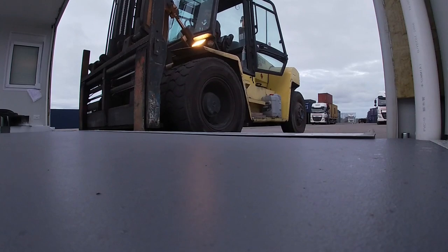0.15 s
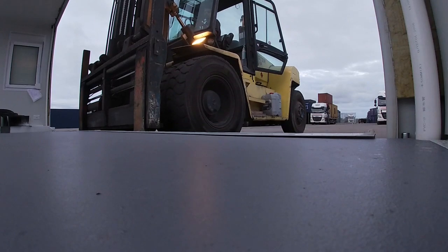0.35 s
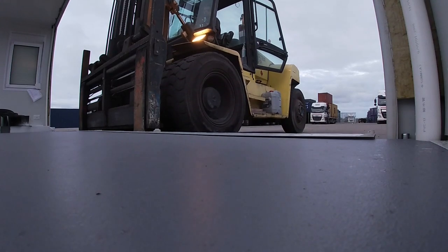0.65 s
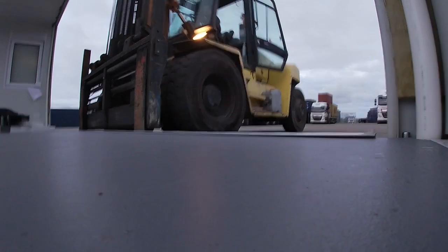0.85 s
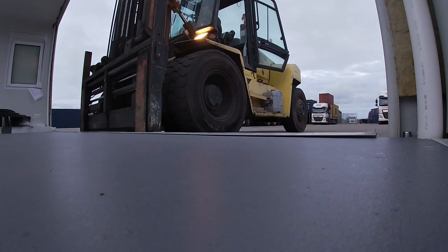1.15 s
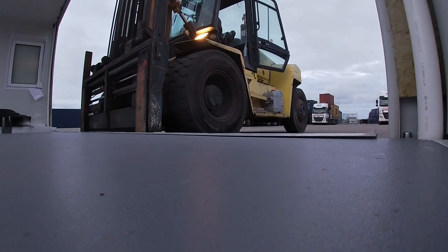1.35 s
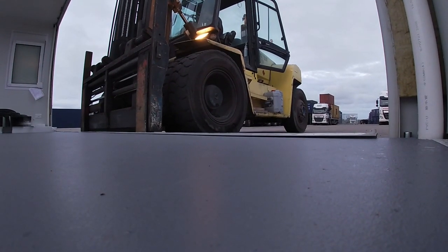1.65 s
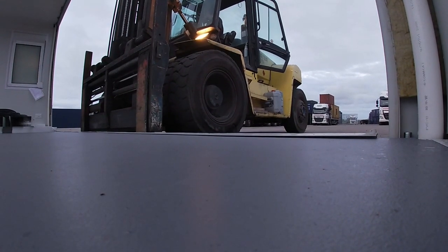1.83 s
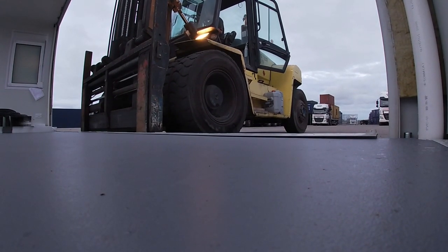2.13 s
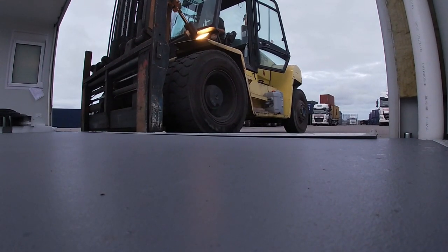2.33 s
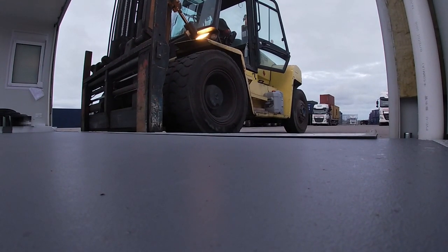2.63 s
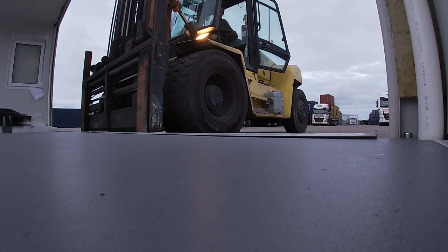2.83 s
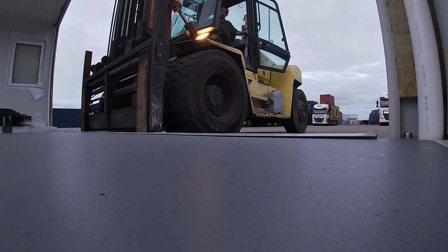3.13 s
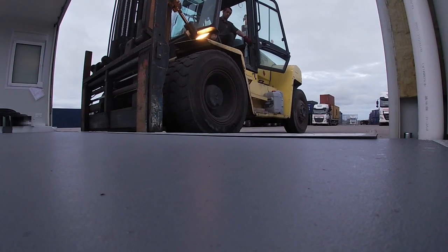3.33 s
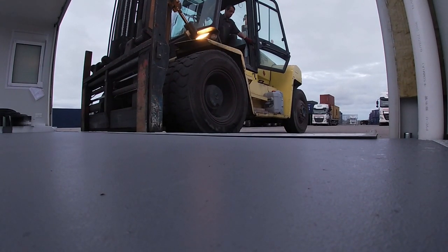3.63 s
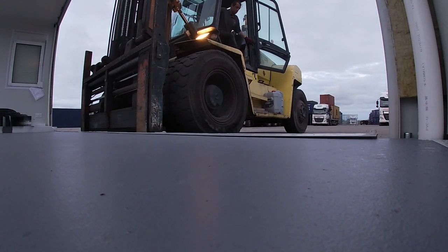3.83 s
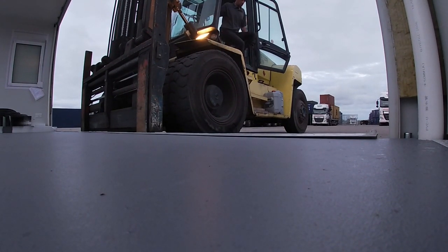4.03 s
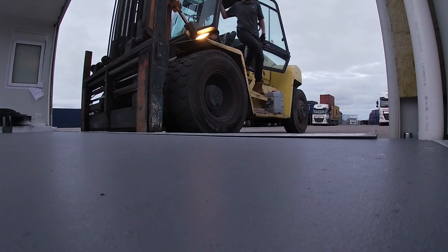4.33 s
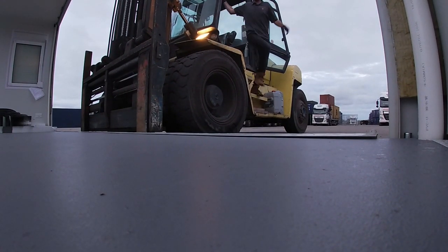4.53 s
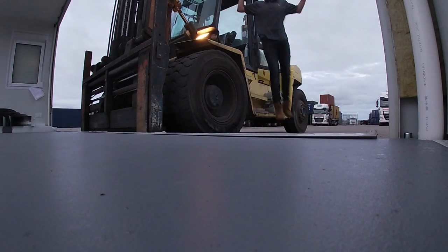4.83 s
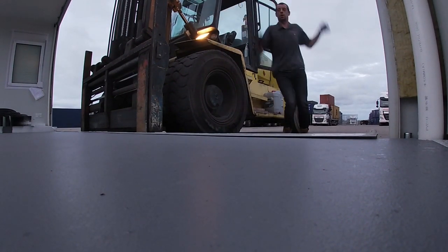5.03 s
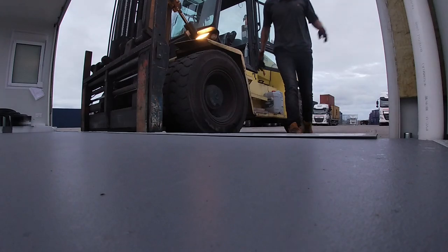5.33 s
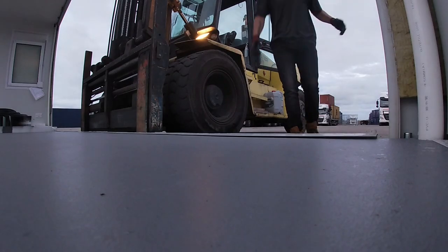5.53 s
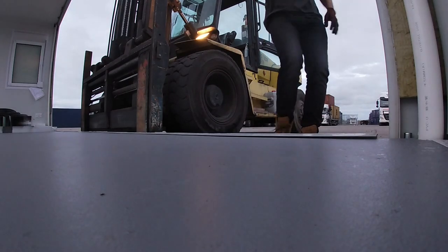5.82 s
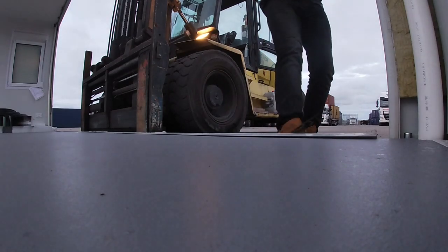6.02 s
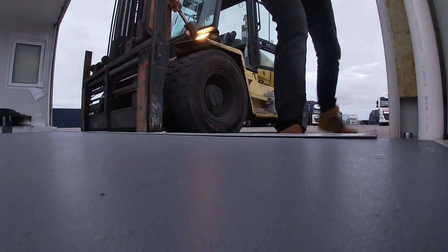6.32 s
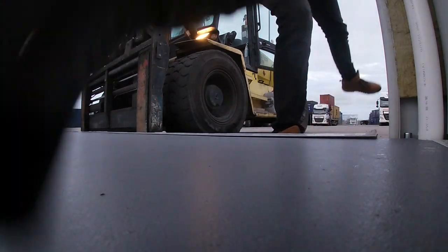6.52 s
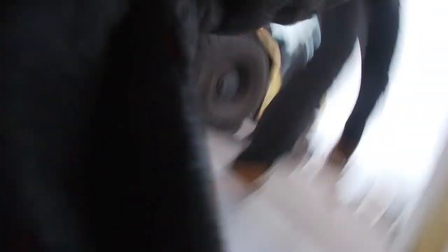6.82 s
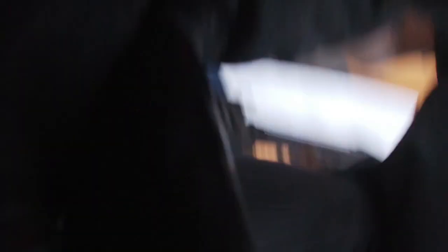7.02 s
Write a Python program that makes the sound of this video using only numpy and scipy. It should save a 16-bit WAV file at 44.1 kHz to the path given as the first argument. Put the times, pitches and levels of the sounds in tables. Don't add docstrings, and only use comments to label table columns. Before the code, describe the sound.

A heavy diesel engine idles steadily outside a loading bay as steel clanks, air puffs and blasts, boots scrape and a hand grabs the microphone.

```python
import sys
import numpy as np
from scipy import signal
from scipy.fft import rfft, irfft, next_fast_len
from scipy.io import wavfile

SR = 44100
rng = np.random.default_rng(int(sys.argv[2]) if len(sys.argv) > 2 else 0)


def bounce(signal):
    frames = np.transpose(np.atleast_2d(signal))
    limited = np.clip(frames, -1, 1)
    pcm = np.round(limited * 32767).astype(np.int16)
    wavfile.write(sys.argv[1], SR, pcm)


def volts_from_db(level):
    exponent = np.asarray(level, float) / 20
    return 10 ** exponent


N = 316197


def rms_one(x):
    return x / np.sqrt(np.mean(x ** 2) + 1e-20)


def in_time(rows):
    s, *columns = np.transpose(rows)
    return [np.interp(np.arange(N) / SR, s, c) for c in columns]


def drift(rate_hz):
    r = np.exp(-80 * np.pi * rate_hz / SR)
    slow = signal.lfilter([1], [1, -2 * r, r * r], rng.standard_normal(N // 40 + 2002))[2000:]
    return np.interp(np.arange(N) / 40, np.arange(len(slow)), rms_one(slow))


def colour(x, spectrum):
    hz, level_db = np.transpose(spectrum)
    size = next_fast_len(N)
    log_hz = np.log(np.arange(size // 2 + 1) * SR / size + 1)
    gain = volts_from_db(np.interp(log_hz, np.log(hz), level_db, left=-90, right=-90))
    return rms_one(irfft(rfft(x, size) * gain, size)[:N])


def resonance(x, hz, width_hz):
    r = np.exp(-np.pi * width_hz / SR)
    zeros = np.array([1, 0, -1]) * (1 - r * r) / 2
    return signal.lfilter(zeros, [1, -2 * r * np.cos(2 * np.pi * hz / SR), r * r], x)


def air(spectrum, flutter_db):
    return colour(rng.standard_normal(N) * volts_from_db(flutter_db * drift(47)), spectrum)


def swell(peak_s, level_db, rise_db_s, hold_s, sag_db_s, fall_db_s):
    t = np.arange(N) / SR - peak_s
    rise_db = rise_db_s * np.minimum(t, 0)
    sag_db = sag_db_s * np.clip(t, 0, hold_s)
    fall_db = fall_db_s * np.maximum(t - hold_s, 0)
    return volts_from_db(level_db + rise_db - sag_db - fall_db)


# multiple of crank speed, level in dB.
EXHAUST_TONES = [(4, -17), (4.5, -22), (5, -6), (6, -6), (7, -12), (7.5, -17), (8, -15.5), (8.5, -27),
                 (9, -13), (9.5, -15), (10, -13), (10.5, -15), (11, -13), (11.5, -17), (12, -3.5),
                 (12.5, -16), (13, -14), (15, -24), (15.5, -17), (16, -16), (17, -20), (18, -23), (19, -25),
                 (19.5, -26), (22, -19), (22.5, -26), (23, -21), (24, -23), (26, -26), (29, -29), (30, -26),
                 (34, -29), (36, -29), (37, -28), (38, -17.5), (39, -28), (41.5, -25), (42, -19), (43, -24)]
# frequency in Hz, width in Hz, lift in dB.
BODY_PANEL = (113.5, 3, 17)


def exhaust(firing_hz, turns, beat_db, tones_db):
    beat = volts_from_db(beat_db + 0.5 * drift(8) + drift(25)) * np.sin(6 * np.pi * turns)
    out = beat
    turns = turns + 0.002 * drift(5)
    panel_hz, width_hz, lift_db = BODY_PANEL
    off_idle_hz = np.abs(firing_hz - 40)
    sag_hz = np.clip(40 - firing_hz, 0, 9)
    for (multiple, level_db), start in zip(EXHAUST_TONES, rng.random(len(EXHAUST_TONES))):
        near = 1 / (1 + ((multiple * firing_hz / 3 - panel_hz) / width_hz) ** 2)
        half_order = multiple % 1 > 0
        waver_db = (1.5 + 2 * half_order + multiple / 40) * drift(3.5)
        loss_db = 0.18 * multiple * off_idle_hz * (multiple > 10) + 5 * sag_hz * (multiple < 11)
        gain = volts_from_db(tones_db - 2.5 + level_db + lift_db * near + waver_db - loss_db)
        out = out + gain * np.sin(2 * np.pi * (multiple * turns + start))
    return np.sqrt(2) * out


# frequency in Hz, density in dB per Hz.
BOOM_SPECTRUM = [(18, -15), (45, -5), (80, -22), (100, -5), (125, -2), (145, 2), (170, -6), (200, -7),
                 (230, -7), (300, -12), (420, -14), (570, -18), (700, -24), (1000, -48)]


def boom(level_db, growl_db):
    unsteady = volts_from_db(0.8 * drift(4) + 1.5 * drift(20))
    rumble = volts_from_db(level_db - 6.7) * colour(rng.standard_normal(N) * unsteady, BOOM_SPECTRUM)
    return rumble + (volts_from_db(growl_db) - 1) * resonance(rumble, hz=380, width_hz=500)


# frequency in Hz, density in dB per Hz.
CLATTER_SPECTRUM = [(470, -9.5), (800, -4.5), (1340, 0.5), (1860, -4.5), (2440, -4), (3400, -7),
                    (4400, -11), (6680, -20), (8430, -38.5), (12000, -39.5), (13300, -46), (14000, -66),
                    (15000, -73)]
CYLINDER_KNOCK_DB = [-0.5, 6, -1, -7, 0.5, 0.26]
# frequency in Hz, width in Hz.
BLOCK_MODES = [(1026, 13), (1152, 21), (1330, 21), (1757, 14), (1931, 11), (2341, 20), (2507, 21),
               (2938, 25), (3337, 17), (4350, 180)]


def clatter(turns):
    firings = 3 * turns
    strength = volts_from_db(np.array(CYLINDER_KNOCK_DB)[firings.astype(int) % 6])
    gate = 1 + 0.064 * strength * 3 * np.exp(-5 * (firings % 1))
    hiss = colour(rng.standard_normal(N) * gate * volts_from_db(drift(13)), CLATTER_SPECTRUM)
    block = sum(resonance(hiss, hz, width_hz) for hz, width_hz in BLOCK_MODES)
    return hiss + 0.69 * block


# start in seconds, length in seconds, change in dB.
BEAT_CHANGES = [
    (1.015, 0.18, -11),
    (1.24, .19, 8.5),
    (1.8, 0.18, -3.5),
    (2.683, .18, -5),
    (3.08, .14, -0.5),
]


def beat_change():
    t, ramp_s = np.arange(N) / SR, 0.04
    out_db = 0
    for s, length_s, level_db in BEAT_CHANGES:
        inside_s = np.minimum(t - s, s + length_s - t)
        out_db = out_db + level_db * np.clip(inside_s / ramp_s + 0.5, 0, 1)
    return out_db


# start in seconds, depth in dB, release in dB per second, let-go in seconds.
GAIN_DUCKS = [
    (1.005, -6, 2.5, 2.03),
    (4.92, 9, 7, 6.4),
    (6.765, -6.5, -7.5, 7.4),
]


def ducking():
    t, clamp_s, let_go_s = np.arange(N) / SR, 0.0095, 0.093
    out_db = 0
    for s, depth_db, release_db_s, free_s in GAIN_DUCKS:
        duck_db = np.minimum(depth_db + release_db_s * np.maximum(t - s, 0), 0)
        clamp = np.clip((t - s) / clamp_s, 0, 1)
        hold = np.clip(1 - (t - free_s) / let_go_s, 0, 1)
        out_db = out_db + duck_db * clamp * hold
    return out_db


# time in seconds, firings per second.
FIRING_RATE = [(0, 40.05), (1.55, 39.9), (1.8, 38.6), (2.0, 38.1), (2.2, 39), (2.45, 40.8), (2.7, 42.9),
               (2.9, 42.1), (3.1, 41.2), (3.35, 40.85), (3.75, 40.55), (4.3, 40.2), (4.8, 40.05),
               (7.17, 40)]
# time in seconds, clatter change in dB, growl change in dB.
ENGINE_LOAD = [(0, .5, 1.5), (1.2, 0.5, 2), (1.65, -6.5, -1.5), (2.0, -3, 2), (2.1, -5, 1.5),
               (2.55, -1.4, 2), (3.15, -0.5, 3.5), (4.0, -.5, 1), (4.9, 0.2, 0.1), (5.5, -3, -1.5),
               (6.3, -0.15, -1), (6.85, 0, 0.1), (7.0, -2, -1.5), (7.17, 1, -1.5)]


def engine():
    firing_hz, = in_time(FIRING_RATE)
    turns = np.cumsum(firing_hz) / SR / 3
    load_db, growl_db = in_time(ENGINE_LOAD)
    duck_db = ducking()
    beat_db = -21.5 + 1.24 * duck_db + beat_change()
    boom_db = -19.5 + duck_db
    clatter_db = -41 + 0.93 * duck_db + load_db
    tones = exhaust(firing_hz, turns, beat_db, boom_db + 0.32)
    return tones + boom(boom_db, growl_db) + volts_from_db(clatter_db) * clatter(turns)


# start in seconds, peak in dB, body tone in Hz, t60 in seconds.
DULL_KNOCKS = [(0.405, -24, 345, 0.12), (0.42, -19.5, 432, 0.12), (0.445, -18.5, 382, 0.12),
               (0.55, -23, 410, 0.08), (.855, -8.5, 115, 0.29), (0.884, -16, 190, 0.17),
               (.872, -23, 310, 0.15), (0.925, -19, 120, 0.19), (1.0035, -8, 280, 0.06),
               (1.0035, -8, 365, .07), (1.0035, -18, 500, .04), (1.015, -18, 170, .04),
               (1.003, -0.5, 106, .09), (1.011, -10, 209, 0.05), (6.759, -12, 290, 0.04),
               (6.76, -12, 370, 0.045), (6.76, -16, 620, 0.038), (6.756, -6, 96, 0.076),
               (5.323, -9, 216, 0.095), (5.327, -11.5, 320, 0.08), (1.266, -9.5, 80.5, 0.23),
               (0.91, -11, 140, 0.03), (1.21, -25, 310, 0.12), (1.231, -17.5, 385, 0.07),
               (1.347, -15, 310, 0.12), (1.9, -21, 75, 0.085), (1.39, -18, 210, 0.16),
               (1.9286, -26.5, 400, 0.16), (3.191, -16, 318, 0.096), (3.196, -24, 480, .06),
               (3.636, -19, 218, .08), (1.046, -17, 190, .06), (1.35, -20.5, 510, .1),
               (5.505, -24, 210, .07), (4.914, -6, 201, 0.042), (4.94, -15, 380, 0.047),
               (5.09, -24.5, 560, 0.23)]


def knocks():
    out = np.zeros(N)
    for (s, peak_db, hz, t60), start in zip(DULL_KNOCKS, rng.random((len(DULL_KNOCKS), 4))):
        at = round(s * SR)
        t = np.arange(min(SR // 3, N - at)) / SR
        build = np.minimum(t * hz / 1.6, 1)
        phases = start * [0, 1, 1, 1]
        for ratio, level_db, turn in zip([1, 1.31, 0.35, 1.7], [3.5, -3.5, -4, -14], phases):
            decay = volts_from_db(-60 * t * np.sqrt(ratio) / t60)
            ringing = np.sin(2 * np.pi * (hz * ratio * t + turn)) * decay
            out[at:][:len(t)] += volts_from_db(peak_db + level_db) * ringing * build
    return out * volts_from_db(2 * drift(45))


# start in seconds, peak in dB, centre in Hz, t60 in seconds, brightness in dB.
STEEL_CRACKS = [(0.612, -34, 5000, .05, -38), (0.622, -30, 3900, 0.089, -38),
                (0.716, -29.5, 4500, 0.04, -12), (0.73, -37, 4500, 0.08, -30),
                (.994, -19.5, 1100, 0.068, -31), (1.002, -24.5, 1670, 0.075, -50),
                (1.031, -50, 10500, .12, -20), (1.033, -34, 2400, .1, -8), (1.04, -25, 1400, 0.11, -12),
                (1.088, -36, 3000, .05, -8), (1.152, -52, 10500, .16, -20), (1.156, -28, 2100, 0.15, -12),
                (1.17, -30, 1200, .12, -20), (1.232, -23, 1260, 0.099, -44), (1.23, -31, 2050, .08, -25),
                (1.258, -27, 1250, .07, -30), (1.324, -27, 1090, 0.14, -40),
                (1.341, -15.5, 1020, 0.14, -33), (1.34, -22, 2200, 0.14, -20),
                (1.344, -20, 3500, 0.12, -26), (1.345, -18, 513, 0.14, -35), (1.045, -25, 700, .1, -35),
                (1.225, -23.5, 646, .12, -35), (1.16, -32, 700, .2, -35), (1.346, -29, 5800, .11, -20),
                (1.388, -30, 4300, 0.09, -10), (1.39, -30, 1300, .1, -30), (2.529, -35.5, 7500, 0.026, -16)]
# start in seconds, peak in dB, centre in Hz, t60 in seconds, brightness in dB.
BOOT_STEPS = [(4.916, -17, 1970, 0.17, -21), (5.236, -33, 2700, .2, -23), (5.326, -27, 4640, 0.066, -7),
              (5.327, -20.5, 1330, 0.17, -35), (5.485, -39, 5450, 0.23, -34),
              (5.518, -24.5, 3500, 0.051, -27), (5.883, -38, 6500, .03, -5), (5.896, -38, 5600, 0.03, -5),
              (5.003, -27, 1200, .08, -20), (5.15, -31, 2000, .08, -20), (5.34, -27, 1400, .12, -30)]
# start in seconds, peak in dB, centre in Hz, t60 in seconds, brightness in dB.
FINGER_GRIP = [
    (6.73, -21, 1580, 0.087, -25),
    (6.74, -22, 3320, 0.14, -9),
    (6.75, -20.5, 2000, 0.11, -18),
    (6.758, -21.5, 895, 0.08, -14),
    (6.76, -16.5, 2410, 0.05, 0.5),
    (6.771, -15, 1310, .06, -29),
    (6.776, -21, 3000, 0.046, -14),
    (6.823, -49, 8000, .012, -10),
    (6.834, -53, 7960, .012, -10),
    (7.146, -36, 3000, .1, -20),
]


def ticks():
    out, length = np.zeros(N), int(0.3 * SR)
    t = np.arange(length) / SR
    bright = signal.butter(3, [2500, 7000], "band", fs=SR, output="sos")
    events = STEEL_CRACKS + BOOT_STEPS + FINGER_GRIP
    for s, peak_db, hz, t60, bright_db in events:
        at = round(s * SR)
        attack = np.minimum(t / (0.065 * t60), 1)
        noise = rng.standard_normal(length) * volts_from_db(-60 * t / t60) * attack
        body = resonance(resonance(noise, hz, 0.66 * hz), hz, 0.66 * hz) * np.sqrt(SR / hz)
        burst = volts_from_db(peak_db - 7.5) * (body + volts_from_db(bright_db) * signal.sosfilt(bright, noise))
        out[at:][:length] += burst[:N - at]
    out = signal.sosfilt(signal.butter(4, 12600, fs=SR, output="sos"), out)
    return out - 0.4 * resonance(out, 9000, 4000)


# start in seconds, peak in dB, pitch in Hz, t60 in seconds.
LOOSE_PARTS = [(0.613, -60, 11900, .12), (0.625, -61, 12400, .15), (6.758, -52, 12000, .06),
               (0.718, -46, 7000, .05), (1.045, -39, 1600, 0.07), (1.236, -33, 1246, 0.12),
               (1.322, -36, 1140, 0.054), (1.329, -28, 1065, .08), (1.346, -24, 1044, .09),
               (1.36, -32, 1500, .15), (1.346, -33, 3500, 0.07), (1.4, -31, 1000, 0.13),
               (1.235, -38, 2050, .12), (5.328, -36, 4700, .05), (4.99, -27, 2350, .2),
               (5.24, -29, 2500, .12), (4.918, -23.5, 1954, 0.081)]


def rings():
    out, t = np.zeros(N), np.arange(SR // 4) / SR
    for s, peak_db, hz, t60 in LOOSE_PARTS:
        noise = rng.standard_normal(len(t))
        rattle = rms_one(resonance(resonance(noise, hz, 0.1 * hz), hz, 0.1 * hz))
        envelope = volts_from_db(peak_db - 3 - 60 * t / t60) * np.minimum(t / 0.002, 1)
        out[round(s * SR):][:len(t)] += envelope * rattle
    return out


# frequency in Hz, density in dB per Hz.
PUFF_SPECTRUM = [(800, -17), (1200, -7), (1900, -7), (2600, -3.5), (4200, -7.5), (7000, -12.5),
                 (12600, -27.5), (15000, -31), (15500, -38)]
# frequency in Hz, width in Hz, level in dB.
VALVE_WHISTLES = [(4250, 700, 9), (2600, 300, 1), (5950, 450, 1), (4920, 300, -1)]
# frequency in Hz, width in Hz, share.
NOZZLE_MODES = [(6700, 400, 0.6), (8420, 300, 0.8), (10600, 300, 0.9), (12700, 350, 0.8)]


def puff():
    white = rng.standard_normal(N)
    whistles = np.zeros(N)
    for hz, width_hz, level_db in VALVE_WHISTLES:
        narrow = resonance(resonance(white, hz, width_hz), hz, 1.3 * width_hz)
        whistles += volts_from_db(level_db) * rms_one(narrow)
    closing = volts_from_db(np.interp(np.arange(N) / SR, [3.53, 3.63, 3.68, 3.73], [-12, 11.5, 11.5, -10]))
    flow = swell(3.511, -33, rise_db_s=645, hold_s=0.04, sag_db_s=5, fall_db_s=173)
    hiss = air(PUFF_SPECTRUM, flutter_db=1.2)
    nozzle = sum(share * resonance(hiss, hz, width_hz) for hz, width_hz, share in NOZZLE_MODES)
    return flow * (hiss + nozzle + closing * rms_one(whistles))


# frequency in Hz, density in dB per Hz.
BLAST_SPECTRUM = [(150, -12), (250, 9.5), (400, 9.5), (580, 5.5), (800, -8), (1130, 0.5), (2070, -5.5),
                  (2630, -6), (6290, -16), (8420, -28.5), (12300, -31.5), (14000, -43.5), (14400, -60)]


def blast():
    hiss = air(BLAST_SPECTRUM, flutter_db=0.9)
    out = hiss
    for hz, width_hz, share in [(2360, 160, 0.8), (1840, 130, 0.45), (2700, 180, 0.26)]:
        out = out + share * volts_from_db(2.2 * drift(14)) * resonance(hiss, hz, width_hz)
    return swell(4.92, -23, rise_db_s=1598, hold_s=0.36, sag_db_s=15.5, fall_db_s=194) * out


# frequency in Hz, density in dB per Hz.
RUB_SPECTRUM = [(500, -9), (900, -9), (1400, -3), (2000, -9), (3000, -11), (5000, -19.5)]


def rub():
    gain = swell(6.8, -41, rise_db_s=2002, hold_s=0.4, sag_db_s=4.5, fall_db_s=100)
    return gain * air(RUB_SPECTRUM, flutter_db=1.0)


# frequency in Hz, density in dB per Hz.
LEAK_SPECTRUM = [(5000, -34), (8500, -4), (9380, -11), (10900, -1.5), (12800, -8.5), (13600, -13),
                 (14000, -25)]


def leak():
    gain = swell(1.88, -72, rise_db_s=90, hold_s=0.66, sag_db_s=-6, fall_db_s=251)
    return gain * air(LEAK_SPECTRUM, flutter_db=0.6)


def bay(x):
    t60_s, level_db = 0.35, -14.5
    size = next_fast_len(N + SR)
    w = 2 * np.pi * np.arange(size // 2 + 1) / size
    response = 0
    for lag in rng.uniform(0.02, 0.054, 8) * SR:
        loop = volts_from_db(-60 * lag / SR / t60_s) * np.exp(-1j * w * lag) / (1 + 1.2j * w)
        response = response + loop / (1 - loop)
    return volts_from_db(level_db) * irfft(rfft(x, size) * response, size)[:N]


# centre in Hz, width in Hz.
BAND_NOTCHES = [(3550, 200), (4180, 260), (5250, 450), (6350, 300), (9500, 4500)]


def thin_bands(x):
    begin_s, end_s, ramp_s = 6.94, 7.135, 0.02
    start = round((begin_s - 0.2) * SR)
    tail = x[start:]
    corners_s = [begin_s - ramp_s, begin_s, end_s, end_s + ramp_s]
    shut = np.interp(np.arange(start, N) / SR, corners_s, [0, 0.9, 0.9, 0])
    for hz, width_hz in BAND_NOTCHES:
        edges_hz = [hz - width_hz / 2, hz + width_hz / 2]
        band = signal.butter(3, edges_hz, "band", fs=SR, output="sos")
        tail = tail - shut * signal.sosfiltfilt(band, tail)
    return np.r_[x[:start], tail]


def scene():
    hits = knocks() + ticks() + rings() + puff()
    return thin_bands(engine() + hits + blast() + rub() + leak() + bay(hits))[None]


def low_pass(x):
    return signal.sosfilt(signal.butter(12, 15560, fs=SR, output="sos"), x)


def record(dry):
    closing = np.minimum(np.arange(N)[::-1] / 300, 1)
    mix = closing * 1.184 * np.tanh(dry / 1.236)
    return low_pass(mix)


dry = scene()
out = record(dry)
bounce(out)
```